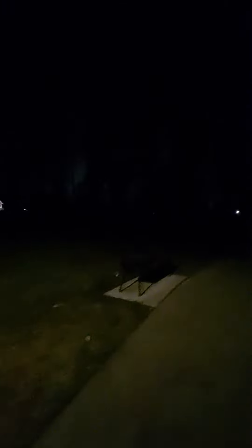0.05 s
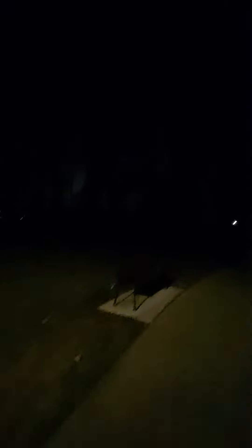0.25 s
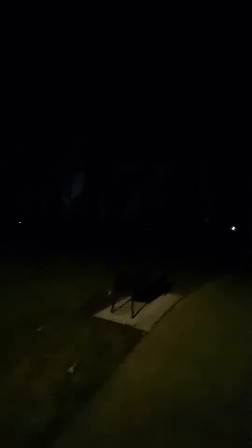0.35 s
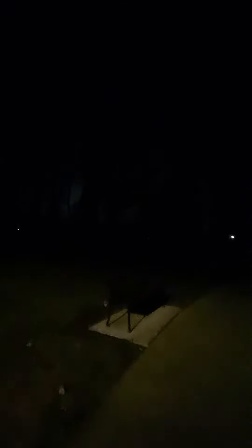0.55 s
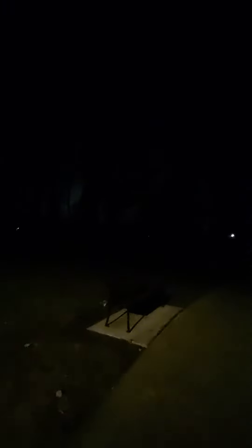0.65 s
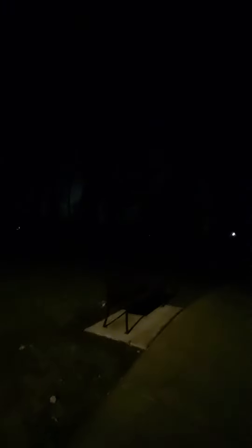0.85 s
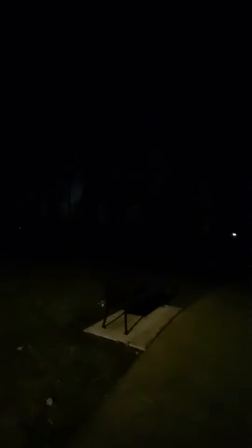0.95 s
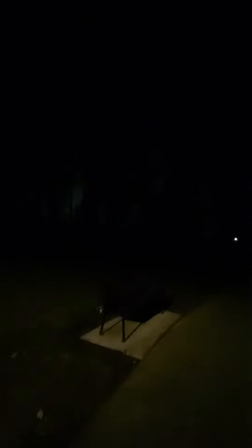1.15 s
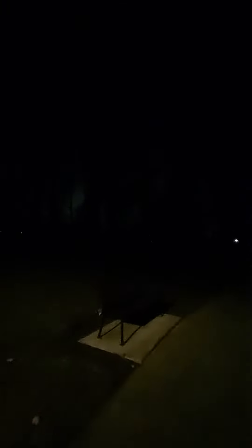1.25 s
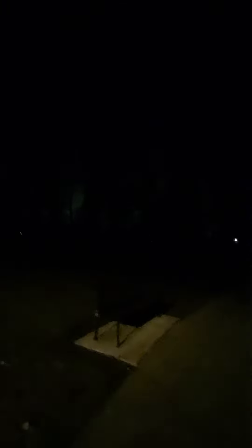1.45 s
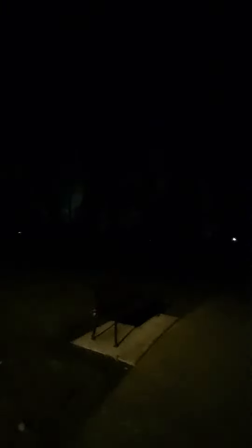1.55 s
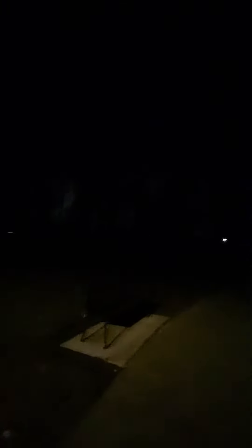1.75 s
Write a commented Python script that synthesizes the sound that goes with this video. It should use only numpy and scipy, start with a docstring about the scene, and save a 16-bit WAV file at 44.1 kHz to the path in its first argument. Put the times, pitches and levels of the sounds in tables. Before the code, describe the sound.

An owl gives two low hoots, the first longer and level, the second short and arching, each echoing faintly among trees. Light wind rumbles in the night air, with very soft rustles and scuffs close to the microphone.

```python
"""Owl at night

An owl hoots twice: a long, level hoot, then a short one that arches up and down.
Its almost pure tone lingers among the trees and returns faintly from farther off.
Light wind rumbles over a distant hush; soft rustles, ticks and scuffs lie close on the right."""
import sys
import numpy as np
from scipy import signal
from scipy.fft import rfft, irfft, next_fast_len
from scipy.io import wavfile
from scipy.ndimage import uniform_filter1d, map_coordinates

SR = 44100
rng = np.random.default_rng(int(sys.argv[2]) if len(sys.argv) > 2 else 0)


def log_audio(samples):
    """Write samples as a 16-bit WAV file to the path given in sys.argv[1]."""
    # one column per channel
    frames = np.atleast_2d(samples).T
    # limit to full scale, then quantise
    limited = np.clip(frames, -1, 1)
    pcm = np.round(limited * 32767).astype(np.int16)
    wavfile.write(sys.argv[1], SR, pcm)


N = 79380
T = np.arange(N) / SR


def owl(right_db=2.5):
    """Two hoots: direct sound, early reflection, far echoes, tail from the trees."""
    # pitch and level contours: t/s, f/Hz, level/dB
    long_hoot = [(.229, 285, -61.5), (.241, 288, -42), (.254, 316.5, -39.5), (.28, 332.7, -36),
                 (.308, 342.4, -36.5), (.335, 325.1, -34), (.385, 316.2, -33.5), (.443, 328.2, -36),
                 (.464, 293.7, -39), (.478, 284.3, -51), (.491, 283, -45), (.499, 281, -58.5)]
    short_hoot = [(.94, 285.4, -61), (.952, 290.8, -42), (.968, 308.4, -40.5), (.988, 332, -41),
                  (1.003, 342.3, -46.5), (1.014, 366, -55), (1.03, 343.6, -45), (1.043, 313.6, -38.5),
                  (1.058, 288, -34.5), (1.066, 289.4, -49.5), (1.085, 317, -56), (1.105, 337.3, -46.5),
                  (1.13, 352.4, -59)]
    # early reflection, rows left and right: delay/s, gain/dB
    near_paths = [(0.0131, -7), (.0124, -20)]
    # distinct echoes: delay/s, gain/dB
    far_paths = [(.11, -26.5), (.175, -27), (.42, -31)]
    voice = hoot(long_hoot) + hoot(short_hoot)
    near = np.array([amp(db) * delayed(voice, delay_s) for delay_s, db in near_paths])
    far = sum(amp(db) * delayed(voice, delay_s) for delay_s, db in far_paths)
    return pan(right_db) * (voice + near + far + tree_scatter(voice))


def hoot(contour, jitter=0.0044, shimmer_db=0.84, flutter_per_s=90):
    """Nearly pure, slightly unsteady tone; airier as the pitch falls."""
    # overtones: harmonic number, level/dB re fundamental
    overtones = [(2, -42), (3, -48)]
    # breath spectrum: f/Hz, relative density/dB
    air_spectrum = [(150, -33.5), (300, -4), (450, -1.5), (620, -0.5), (1000, -7.5), (1600, -30.5),
                    (4000, -61)]
    air_db, fall_boost_db, full_fall_hz_per_s = -28, 4.5, 520
    pitch_hz, level_db = curves(contour)
    phase = 2 * np.pi * np.cumsum(pitch_hz * (1 + jitter * wobble(flutter_per_s))) / SR
    tone = np.sin(phase) + sum(amp(db) * np.sin(round(k) * phase) for k, db in overtones)
    fall_hz_per_s = -np.gradient(pitch_hz) * SR
    falling = uniform_filter1d(np.clip(fall_hz_per_s / full_fall_hz_per_s, 0, 1), size=600)
    air = amp(air_db + fall_boost_db * falling ** 2) * noise(air_spectrum)
    sounding = (T > contour[0][0]) & (T < contour[-1][0])
    gate = uniform_filter1d(1.0 * sounding, size=300)
    envelope = gate * amp(level_db + shimmer_db * wobble(flutter_per_s))
    return envelope * (np.sqrt(2) * tone + air)


def tree_scatter(voice, gain_db=-21.5, t60_s=0.57, gap_s=0.053):
    """Decaying cloud of reflections from the trees; favours the top notes."""
    # response of the woods: f/Hz, gain/dB
    woods_response = [(250, -6.5), (300, -1.5), (325, -6.5), (350, 14.5), (385, 4.5), (500, 3)]
    coloured = colour(voice, woods_response)
    decay = (T > gap_s) * amp(-60 * T / t60_s)
    reflections = rng.standard_normal((2, N)) * decay
    tail = signal.fftconvolve(coloured[None], reflections, axes=1)[:, :N]
    tail /= tail.std(axis=1, keepdims=True) + 1e-12
    return amp(gain_db) * coloured.std() * tail


def wind(trim_db=-0.5, right_db=3.5):
    """Low rumble that swells and eases."""
    # gusts: t/s, level/dB
    gusts = [(0, -53), (.1, -54), (.25, -48), (.42, -45.5), (.56, -48), (.72, -52), (.9, -51), (1.1, -44),
             (1.35, -52.5), (1.8, -51)]
    # rumble spectrum: f/Hz, relative density/dB
    spectrum = [(20, -35.5), (30, -15.5), (45, -3.5), (65, 1), (80, 2), (100, -2.5), (125, -5.5),
                (155, -8.5), (190, -28.5), (300, -36), (510, -78.5)]
    level_db, = curves(gusts)
    return pan(right_db) * amp(level_db + trim_db) * wide_noise(spectrum, side_db=-15)


def rustle(rub_trim_db=-1.5, fizz_trim_db=3, grain_db=1.5, grains_per_s=400, right_db=5):
    """Soft, grainy rubbing near the microphone, with a high fizz."""
    # envelopes: t/s, rub level/dB, fizz level/dB
    envelopes = [(0, -72.5, -73.5), (.12, -72, -73.5), (.23, -78, -78), (.32, -73, -74), (.39, -79, -78),
                 (.51, -85, -93), (.61, -78.5, -77), (.69, -78.5, -77), (.735, -86, -80),
                 (.81, -75.5, -73.5), (.91, -81, -76), (1.03, -77, -75), (1.12, -84, -80.5),
                 (1.3, -83.5, -85.5), (1.41, -80, -84), (1.465, -74.5, -75), (1.52, -78, -73.5),
                 (1.6, -92.5, -85.5), (1.8, -84.5, -88)]
    # spectra of the two bands: f/Hz, relative density/dB
    rub_spectrum = [(900, -17), (2200, -3.5), (2850, 2.5), (3600, 0.5), (5500, 2.5), (7000, -3.5),
                    (8000, -25), (11000, -26.5)]
    fizz_spectrum = [(3000, -39), (8000, -15), (10000, -4), (12000, 4.5), (15500, 3)]
    rub_db, fizz_db = curves(envelopes)
    rub = amp(rub_db + rub_trim_db) * wide_noise(rub_spectrum)
    fizz = amp(fizz_db + fizz_trim_db) * wide_noise(fizz_spectrum)
    grain = amp(grain_db * wobble(grains_per_s))
    return pan(right_db) * (rub + fizz) * grain / np.sqrt(2)


def ticks(trim_db=-3.5, right_db=7):
    """Small snaps in the rustle, each a decaying noise burst in its own band."""
    # snaps: t/s, level/dB, centre f/Hz, width/octaves, decay/s
    snaps = [(0.0314, -45, 6940, 1.6, .0011), (0.116, -55.5, 4600, 0.36, 0.0035),
             (0.296, -58, 2954, 0.1, 0.0016), (.323, -59, 2863, .2, .003), (.351, -54.5, 11950, .3, .0012),
             (0.6227, -54.5, 6500, 1.0, .0014), (0.7038, -55, 12040, .4, 0.001104),
             (0.7645, -56, 14000, 1, .0011), (1.5299, -56, 12000, 1.6, .0014)]
    bursts = np.zeros((2, N))
    for start_s, db, centre_hz, width_oct, decay_s in snaps:
        white = rng.standard_normal((2, N))
        band = filtered(white, lambda hz: np.exp(-.5 * (np.log2((hz + 1) / centre_hz) / width_oct) ** 2))
        envelope = (T >= start_s) * np.exp(-np.abs(T - start_s) / decay_s)
        bursts += amp(db + trim_db) * envelope * unit(band)
    return pan(right_db) * bursts / 2


def scuffs(right_db=5):
    """Soft, dull scuffs of slow walking."""
    # steps: centre t/s, half length/s, level/dB
    steps = [(0.01, 0.049, -70), (0.641, 0.1, -71), (1.478, 0.078, -74)]
    # scuff spectrum: f/Hz, relative density/dB
    spectrum = [(500, -18), (1000, 6.5), (1700, -3.5), (2600, -10), (3300, -12.5), (4500, -34.5),
                (10000, -38)]
    swell = sum(amp(db) * np.exp(-((T - centre_s) / half_s) ** 2) for centre_s, half_s, db in steps)
    return pan(right_db) * swell * wide_noise(spectrum) / np.sqrt(2)


def hush(level_db=-61.5, right_db=1):
    """Steady, dull, distant background."""
    # hush spectrum: f/Hz, relative density/dB
    spectrum = [(100, -31), (200, 7.5), (400, -2.5), (650, -4), (1050, -4), (1300, -11), (1600, -21.5),
                (2200, -37.5), (5000, -39.5), (15000, -35.5)]
    return pan(right_db) * amp(level_db) * wide_noise(spectrum, side_db=-6)


def amp(db):
    """dB to gain."""
    return 10 ** (np.asarray(db) / 20)


def unit(x):
    """Scale to rms 1."""
    return x / np.sqrt(np.mean(x ** 2) + 1e-20)


def pan(right_db):
    """Channel gains: left down, right up by right_db."""
    return amp([[-right_db], [right_db]])


def delayed(x, delay_s):
    """x arriving delay_s later."""
    return np.interp(T - delay_s, T, x, left=0)


def curves(rows):
    """Per-sample curve for each column after the time."""
    times_s, *columns = np.transpose(rows)
    return [np.interp(T, times_s, column) for column in columns]


def wobble(knots_per_s):
    """Smooth random curve."""
    knots = rng.standard_normal(int(N * knots_per_s / SR) + 4)
    return map_coordinates(knots, [T * knots_per_s])


def along(points, hz):
    """(f/Hz, value) points read on a log frequency axis."""
    knots_hz, values = np.transpose(points)
    return np.interp(np.log(hz + 1), np.log(knots_hz + 1), values)


def filtered(x, response):
    """FFT filter with gain response(hz)."""
    size = next_fast_len(N + SR // 2)
    hz = np.fft.rfftfreq(size, 1 / SR)
    return irfft(rfft(x, size) * response(hz), size)[..., :N]


def colour(x, points):
    """x shaped by (f/Hz, gain/dB) points."""
    return filtered(x, lambda hz: amp(along(points, hz)))


def noise(spectrum):
    """Shaped noise, rms 1."""
    return unit(colour(rng.standard_normal(N), spectrum))


def wide_noise(spectrum, side_db=0):
    """Stereo noise: mid at rms 1, side at side_db."""
    mid, side = noise(spectrum), amp(side_db) * noise(spectrum)
    return np.array([mid + side, mid - side])


def scene():
    """Owl over the night sounds, stereo."""
    return owl() + wind() + hush() + rustle() + scuffs() + ticks()


def record(dry, top_hz=15800):
    """Two unequal microphones and the recorder's band limit."""
    # left microphone re right: f/Hz, gain/dB
    left_gain = [(45, 1), (120, 1.5), (240, -3), (320, -0.5), (530, 3), (900, -4), (1330, -8), (1950, 3),
                 (3100, -0.5), (5000, -2.5), (8000, 6), (12500, -3.5)]
    # left microphone re right: f/Hz, phase lead/rad
    left_lead = [(40, 0.41), (100, 0.81), (160, 0.13), (300, 0), (1000, .3), (3000, 0)]
    left = colour(dry[0], left_gain)
    left = filtered(left, lambda hz: np.exp(1j * along(left_lead, hz)))
    return filtered(np.array([left, dry[1]]), lambda hz: hz < top_hz)


dry = scene()
out = record(dry)
log_audio(out)
```